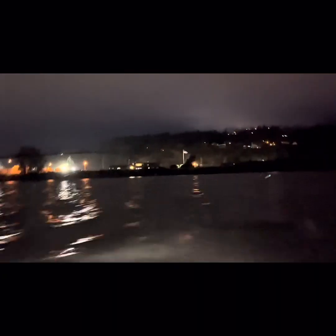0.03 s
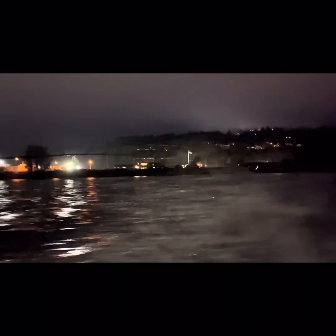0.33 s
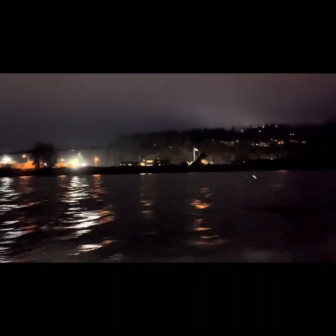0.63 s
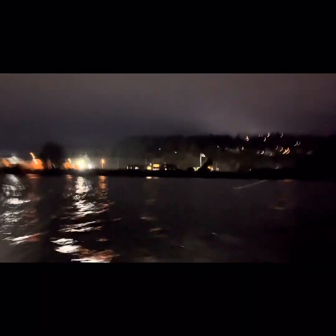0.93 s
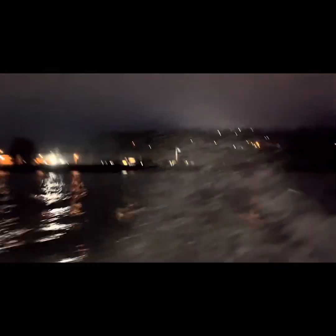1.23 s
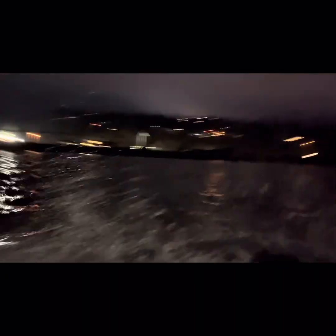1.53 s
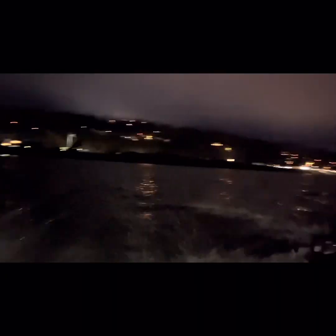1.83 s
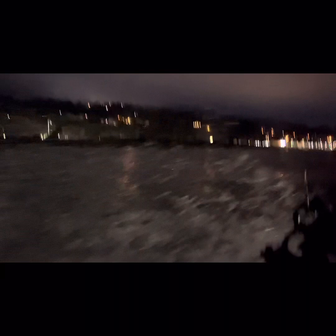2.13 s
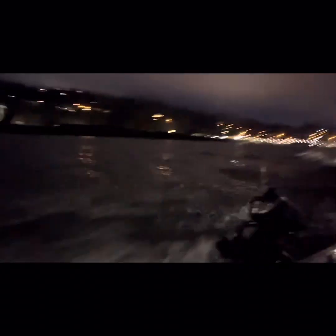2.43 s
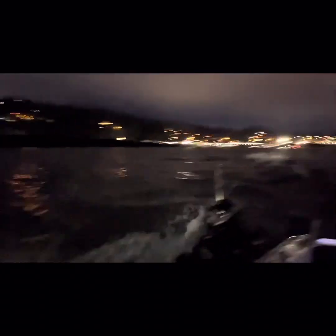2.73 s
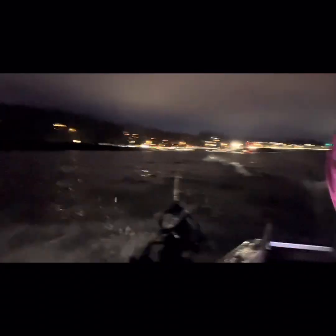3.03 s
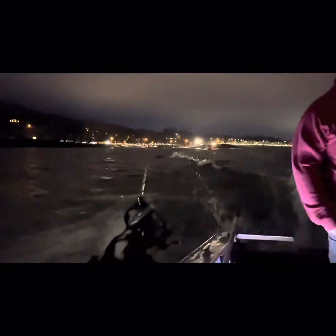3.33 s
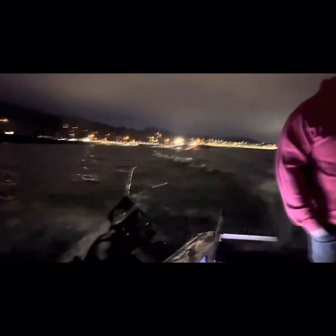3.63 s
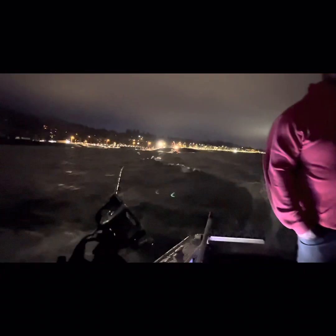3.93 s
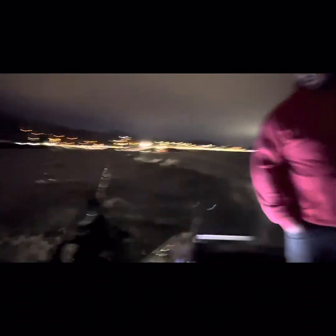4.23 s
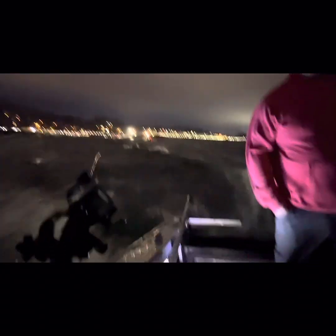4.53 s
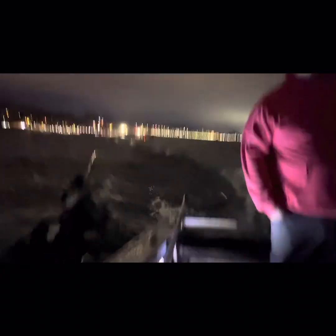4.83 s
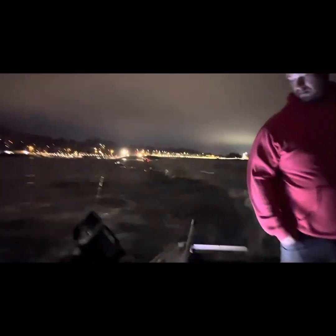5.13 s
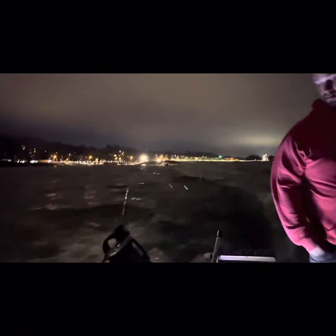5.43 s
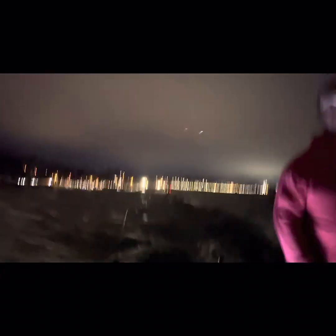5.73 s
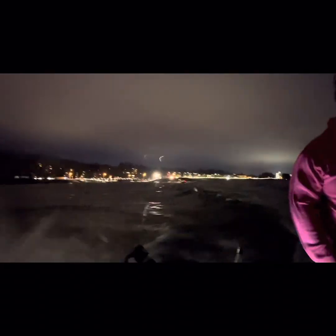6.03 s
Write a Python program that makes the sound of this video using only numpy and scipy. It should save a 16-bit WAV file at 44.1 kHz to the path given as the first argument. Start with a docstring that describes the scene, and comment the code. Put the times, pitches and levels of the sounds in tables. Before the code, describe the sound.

An open motorboat speeds over a choppy river, heard close up on board. From the start the outboard drones, water hisses along the hull and wind buffets the microphone. Just before one second, waves smack and burst into spray, and the hull gives a short, low boom. The wash then keeps surging with more gusts and splashes while the engine creeps slightly up in pitch.

```python
"""An open motorboat runs fast over choppy river water, heard on board through two close microphone ports.
From the start the outboard's firing drones, water hisses along the hull, and headwind buffets the ports.
Just before one second, waves smack and burst into spray, and the heaviest makes the hull boom.
After that the wash keeps surging, with more gusts and splashes, while the engine speed creeps up."""
import sys
import numpy as np
from scipy import signal
from scipy.fft import rfft, irfft
from scipy.io import wavfile
from scipy.ndimage import uniform_filter1d

SR = 44100
rng = np.random.default_rng(int(sys.argv[2]) if len(sys.argv) > 2 else 0)


def log_audio(samples):
    """Write samples as a 16-bit WAV file to the path given in sys.argv[1]."""
    # one column per channel
    frames = np.atleast_2d(samples).T
    # limit to full scale, then quantise
    limited = np.clip(frames, -1, 1)
    pcm = np.round(limited * 32767).astype(np.int16)
    wavfile.write(sys.argv[1], SR, pcm)


N = 268569
T, HZ = np.arange(N) / SR, np.fft.rfftfreq(N, 1 / SR)

# how alike the wind sounds on the left and right: pitch_hz, likeness (1 same, 0 unrelated, -1 opposite)
WIND_LIKENESS = [(50, .95), (100, .9), (200, .69), (400, .62), (700, .45), (1000, .15), (1500, -.25),
                 (2000, .3), (8000, .2)]
# how alike the water sounds on the left and right: pitch_hz, likeness
WATER_LIKENESS = [(100, .85), (500, .62), (900, .15), (1250, -.05), (1600, -.6), (1750, .68), (2500, .5),
                  (5000, .42), (6500, .55), (7500, .82), (8300, .97), (10000, .85), (12000, .96),
                  (14000, .85)]


def amp(db):
    """Turns decibels into a gain."""
    return 10 ** (np.asarray(db) / 20)


def unit(x):
    """Scales a signal to an average (rms) level of 1."""
    return x / np.sqrt(np.mean(x ** 2) + 1e-20)


def over_time(rows):
    """Joins the rows of a timed table into one curve per column."""
    times, *columns = np.transpose(rows)
    return [np.interp(T, times, column) for column in columns]


def over_pitch(rows):
    """Joins the rows of a table into a curve from low to high pitch."""
    hz, value = np.transpose(rows)
    return np.interp(np.log(HZ + 1), np.log(hz + 1), value)


def wander(hz):
    """A smooth random wobble that moves up to about hz times a second."""
    return unit(irfft(rfft(rng.standard_normal(N)) * np.exp(-(HZ / hz) ** 2), N))


def white():
    """Two unrelated noises."""
    return rng.standard_normal((2, N))


def treble(x, corner_hz):
    """The part of a sound above corner_hz."""
    return irfft(rfft(x) * (1 - 1 / (1 + (HZ / corner_hz) ** 6)), N)


def steady(x, span_s):
    """Evens out the slow level changes of a noise and keeps its fast grain."""
    window = np.hanning(max(int(span_s * SR), 9))
    power = signal.fftconvolve((x ** 2).mean(0), window / window.sum(), "same")
    return x / np.sqrt(power + 1e-9)


def patchy(x, depth_db, span_hz, span_s, size):
    """Lets the level drift separately in small patches of pitch and time."""
    frames = dict(nperseg=size, noverlap=size * 3 // 4)
    spectrum = signal.stft(x, **frames)[2]
    drift = rng.standard_normal(spectrum.shape[1:])
    for axis, span in enumerate((span_hz * size / SR, span_s * 4 * SR / size)):
        drift = uniform_filter1d(drift, max(round(span), 1), axis)
    return signal.istft(spectrum * amp(depth_db * unit(drift)), **frames)[1][:, :N]


def strike(start_s, rise_s, decay_s):
    """The level of one hit: it climbs straight to 1, then dies away."""
    age = T - start_s
    return np.clip(age / rise_s, 0, 1) * np.exp(-np.maximum(age - rise_s, 0) / decay_s)


def ports(pair, gain, likeness):
    """Shapes the tone of two unrelated signals and blends them into a partly alike left and right."""
    # how much louder the left port hears: pitch_hz, level_db
    balance = [(50, 0), (500, .6), (720, 1.6), (980, .8), (1200, -2.2), (1500, -3.7), (1630, -3.4),
               (1720, 2), (2300, 1.6), (3000, .8), (4000, .8), (4800, 2), (6000, 1), (8000, 0)]
    # how far the left port is ahead: pitch_hz, phase_radians
    left_lead = [(50, -.1), (300, -.25), (700, -.45), (1300, 0), (2000, .3), (3100, .9), (4800, .2),
                 (6500, -1.35), (8300, -3.14), (10000, -4.8), (12000, -6.3), (15300, -9.2)]
    same = np.clip(over_pitch(likeness), -1, 1)
    lean = amp(over_pitch(balance) / 2)
    common, apart = rfft(pair) * gain * np.sqrt([1 + same, 1 - same])
    left = (common + apart) * lean
    right = (common - apart) / lean * np.exp(-1j * over_pitch(left_lead))
    return unit(irfft(np.array([left, right]), N))


def thumps(rise_s=.0082, decay_s=.014):
    """The level of large, slow eddies (swirls of air) that thump the microphone."""
    # large eddies: peak_s, level_db
    eddies = [(.091, -22), (.445, -21), (1.644, -12), (1.745, -13), (1.86, -13), (1.907, -13), (2.428, -14),
              (3.029, -15), (3.129, -15), (3.175, -10), (3.31, -9.5), (3.42, -9), (3.707, -12),
              (3.899, -10.5), (4.188, -15.5), (4.359, -15), (4.45, -13.5), (4.545, -19), (5.059, -14),
              (5.216, -15), (5.424, -16), (5.504, -13.5), (5.57, -10.5), (5.641, -11.5), (5.77, -14),
              (5.812, -12.5)]
    level = 0
    for peak_s, db in eddies:
        distance = np.maximum((peak_s - T) / rise_s, (T - peak_s) / decay_s)
        level += amp(db) * np.exp(-np.minimum(distance ** 2 / 2, 20))
    return level


def headwind(rise_s=.02, fall_s=.022, throb_hz=8.8, throb_db=1.3, throb_delay_s=.034):
    """Gusts swell, throb as they shed eddies, and fade: a low rumble under a lumpy flutter."""
    # gusts of wind: start_s, length_s, rumble_db, flutter_db
    gusts = [(0, 0.11, -19.5, -22), (0.172, 0.051, -24, -25.5), (0.418, .025, -19, -24.5),
             (0.549, 0.086, -17, -20), (0.817, 0.05, -25, -20.5), (1.038, 0.029, -19, -25.5),
             (1.08, 0.044, -18.5, -20.5), (1.573, 0.12, -17, -17.5), (1.712, 0.047, -16, -20.5),
             (1.788, 0.22, -19, -18.5), (2.292, 0.12, -23.5, -25.5), (2.52, 0.029, -22, -24.5),
             (2.641, 0.075, -16.5, -21), (2.777, 0.03, -24, -41), (2.896, 0.088, -21.5, -25),
             (3, 0.25, -21, -24.5), (3.288, .09, -18, -22.5), (3.378, 0.067, -15.5, -18),
             (3.468, 0.037, -23, -25.5), (3.66, 0.079, -16.5, -19), (3.76, 0.15, -22, -20.5),
             (4.142, 0.036, -22, -21), (4.262, 0.11, -21, -20.5), (4.428, 0.173, -27.5, -27),
             (4.734, .05, -29, -37), (4.86, 0.098, -19.5, -26.5), (5.028, 0.039, -22, -21),
             (5.088, 0.064, -16, -20), (5.216, 0.052, -17, -23), (5.321, 0.017, -17, -24),
             (5.366, 0.082, -16.5, -19), (5.5, 0.13, -21, -23.5), (5.684, 0.18, -20, -21),
             (5.918, 0.044, -22, -32), (6.015, .043, -16.5, -23)]
    # tone of the rumble: pitch_hz, level_db
    rumble_tone = [(22, -55), (43, -6.5), (65, 0.5), (90, -1), (130, -7.5), (200, -15.5), (400, -53),
                   (1500, -97)]
    # tone of the flutter: pitch_hz, level_db
    flutter_tone = [(30, -33), (90, -21), (150, -1), (300, -4), (500, -6), (680, -10), (850, -13),
                    (1200, -19), (1600, -31.5), (1800, -28.5), (4500, -83), (14000, -134)]
    rumble_power, flutter_power = amp(-26) ** 2, amp(-30.5) ** 2  # the wind between gusts
    for start_s, length_s, rumble_db, flutter_db in gusts:
        age = T - start_s
        gust = np.clip(age / rise_s + .5, 0, 1) * np.exp(-np.maximum(age - length_s, 0) / fall_s)
        gust *= amp(throb_db * np.cos(2 * np.pi * throb_hz * (age - throb_delay_s)))
        rumble_power += (amp(rumble_db) * gust) ** 2
        flutter_power += (amp(flutter_db) * gust) ** 2
    rumble_power += thumps() ** 2
    rumble = steady(ports(white(), amp(over_pitch(rumble_tone)), WIND_LIKENESS), span_s=.055)
    lumps = patchy(white(), depth_db=3, span_hz=298, span_s=.017, size=512) * amp(1.36 * wander(98))
    flutter = steady(ports(lumps, amp(over_pitch(flutter_tone)), WIND_LIKENESS), span_s=.04)
    waver = amp(.86 * wander(22))
    return waver * (np.sqrt(rumble_power) * rumble + np.sqrt(flutter_power) * flutter)


def buffets(rise_s=.0014, decay_s=.0064, middle_hz=272.7):
    """Each hard eddy hits the microphone with a short, ragged puff; larger eddies sound lower."""
    # the hardest eddies: peak_s, level_db, pitch_hz
    eddies = [(0.031, -14, 260), (.132, -15, 351), (.148, -16.5, 250), (.25, -18, 400), (.29, -15, 372),
              (.575, -15.5, 280), (.595, -14.5, 210), (.633, -10.5, 279), (1.06, -19.5, 230),
              (1.123, -13, 220), (1.585, -15, 253), (1.606, -11, 275), (1.629, -11, 190),
              (1.724, -8.5, 362), (1.735, -8, 280), (1.761, -13.5, 315), (1.801, -11, 416),
              (1.826, -11.5, 360), (1.854, -16, 180), (1.894, -14, 268), (1.935, -15, 295),
              (1.996, -12.5, 325), (2.058, -15.5, 250), (2.292, -16, 268), (2.359, -16.5, 282),
              (2.392, -17, 285), (2.456, -14.5, 200), (2.645, -10.5, 360), (2.659, -17, 250),
              (2.699, -14.5, 345), (3.109, -16, 220), (3.17, -7, 289), (3.291, -10, 370), (3.306, -17, 211),
              (3.358, -13, 330), (3.397, -11.5, 239), (3.449, -13, 310), (3.552, -17, 295),
              (3.641, -13.5, 280), (3.696, -10.5, 320), (3.713, -10.5, 244), (3.861, -10.5, 427),
              (4.123, -16, 335), (4.161, -15, 360), (4.278, -17.5, 285), (4.336, -6.5, 330),
              (4.369, -9.5, 270), (4.542, -16.5, 240), (4.715, -18, 302), (4.744, -16, 240),
              (4.861, -14.5, 345), (4.918, -10, 234), (5.074, -14, 348), (5.096, -17, 338),
              (5.114, -11, 307), (5.139, -11.5, 268), (5.232, -13.5, 251), (5.333, -14.5, 244),
              (5.389, -13, 250), (5.494, -13.5, 330), (5.558, -10.5, 240), (5.696, -12.5, 250),
              (5.752, -8.5, 247), (5.846, -15, 272), (6.04, -13.5, 290)]
    # tone of a middle-sized eddy: pitch_hz, level_db
    tone = [(20, -34), (65, -22), (130, -5.5), (300, 0), (500, -8.5), (700, -10.5), (900, -24.5),
            (1250, -24.5), (1800, -38), (4500, -84), (14000, -97)]
    air = steady(ports(white(), amp(over_pitch(tone)), WIND_LIKENESS), span_s=.009)
    out = np.zeros((2, N))
    for peak_s, db, hz in eddies:
        near = slice(*np.searchsorted(T, (peak_s - 4 * rise_s, peak_s + 4 * decay_s)))
        age = T[near] - peak_s
        retuned = np.array([np.interp(peak_s + age * hz / middle_hz, T, side) for side in air])
        puff = np.exp(-np.maximum(-age / rise_s, age / decay_s) ** 2 / 2)
        out[:, near] += amp(db) * puff * retuned
    return out


def facing_wind(air):
    """Wind that meets the ports head-on sheds smaller eddies and sounds brighter."""
    # how squarely the wind hits: time_s, treble_db
    exposure = [(0, -7.5), (1.1, -3), (1.7, -7), (2.3, 5), (2.7, -0.5), (3.4, 7.5), (3.7, 1), (4.35, -3.5),
                (5.1, 4), (5.4, 4), (5.8, 3), (6.09, -2)]
    (treble_db,) = over_time(exposure)
    return air + (amp(treble_db) - 1) * treble(air, corner_hz=900)


def drops(per_s, spread_db):
    """Scattered ticks of landing drops, mostly small and a few large."""
    size = amp(spread_db * np.minimum(rng.exponential(1, (2, N)), 4))
    return unit(white() * size * (rng.random((2, N)) < per_s / SR))


def surges(width_scale):
    """The water's level as the hull ploughs through two or three waves a second."""
    # waves: crest_s, level_db, half_width_s (before width_scale)
    waves = [(.01, -36, 0.056), (.22, -41.5, .04), (.43, -35, 0.12), (.86, -32, 0.09), (1.22, -37.5, 0.12),
             (1.63, -33.5, 0.13), (2.08, -36, 0.14), (2.57, -34.5, 0.12), (3.08, -43, 0.052),
             (3.33, -35, 0.14), (3.86, -40.5, 0.077), (4.2, -38, 0.085), (4.63, -42, 0.045),
             (5.06, -39, 0.085), (5.43, -40.5, 0.084), (5.819, -37.5, 0.13)]
    power = sum(amp(db) ** 2 * np.exp(-((T - crest_s) / (width * width_scale)) ** 2 / 2)
                for crest_s, db, width in waves)
    return np.sqrt(power)


def wash(calm_rush_db=-30.5, calm_spray_db=-40, rush_boost_db=8):
    """Churning water and fine spray swell with each wave, dotted with drops and gurgling with bubbles."""
    # tone of the rushing water: pitch_hz, level_db
    rush_tone = [(25, -24), (100, 16), (300, 15), (550, 11), (900, 5), (1300, 6), (1600, 4.5), (1750, 2),
                 (2600, 2), (4600, 0.5), (5600, -4.5), (7500, -3.5), (10000, -112), (16000, -40)]
    # tone of the spray: pitch_hz, level_db
    spray_tone = [(2500, -30), (4700, -7), (6500, -1.5), (8300, -1.3), (9500, 1.2), (11500, .3),
                  (13000, -2.5), (14500, -7.5)]
    churn = white() * amp(.12 * wander(52)) + .5 * drops(per_s=1700, spread_db=2)
    mist = white() * amp(.79 * wander(45)) + .084 * drops(per_s=2700, spread_db=14)
    churn, mist = (patchy(x, depth_db=2.5, span_hz=170, span_s=.04, size=1024) for x in (churn, mist))
    rush = ports(churn, amp(over_pitch(rush_tone)), WATER_LIKENESS)
    spray = ports(mist, amp(over_pitch(spray_tone)), WATER_LIKENESS)
    # the steady spray fades a little as the microphone turns from the side to the stern
    turn_db = np.interp(T, (1.9, 3.4), (0, -1.4))
    rush_level = np.hypot(amp(calm_rush_db), amp(rush_boost_db) * surges(width_scale=.78))
    spray_level = np.hypot(amp(calm_spray_db + turn_db), surges(width_scale=.79))
    return rush_level * rush + spray_level * spray


def showers():
    """Fine drops fall back together and fizz."""
    # sheets of falling spray: start_s, level_db
    sheets = [(.19, -33), (.725, -30), (.872, -24), (.93, -35), (1.615, -36), (2.6, -32), (4.59, -33),
              (5.825, -37)]
    # tone of the fizz: pitch_hz, level_db
    tone = [(2000, -25), (5000, -8), (8000, -2), (11000, 0), (14500, -4)]
    level = sum(amp(db) * strike(start_s, rise_s=.005, decay_s=.014) for start_s, db in sheets)
    fizz = white() + drops(per_s=2500, spread_db=3)
    return level * ports(fizz, amp(over_pitch(tone)), WATER_LIKENESS)


def smacks():
    """A small crest meets the hull flat: a bright crack that is gone at once."""
    # small crests: start_s, level_db
    crests = [(.826, -21), (.84, -20), (.869, -23), (.88, -23), (2.445, -22.5), (3.346, -22.5),
              (3.751, -27.5), (4.124, -23), (5.243, -23), (5.775, -17.5), (5.847, -26.5)]
    # tone of the crack: pitch_hz, level_db
    tone = [(300, -12), (1200, -6), (2000, -2), (3000, 0), (4600, -2), (6000, -10), (9000, -20),
            (15000, -30)]
    level = sum(amp(db) * strike(start_s, rise_s=.0007, decay_s=.0065) for start_s, db in crests)
    return level * ports(white(), amp(over_pitch(tone)), WATER_LIKENESS)


def splashes():
    """A wave bursts on the hull into a crackle that quickly fades; finer drops sound brighter."""
    # bursting waves: start_s, level_db, rise_s, decay_s, treble_db
    bursts = [(.008, -26, .0091, .02, 3.5), (.825, -23, .0036, 0.012, -2), (0.84, -18.5, 0.0052, 0.023, 0),
              (.855, -21, .004, 0.061, -1), (1.612, -26, 0.011, 0.054, 6), (2.59, -40, .011, .03, 0),
              (3.286, -22.5, 0.0015, 0.012, -3), (3.347, -23, .0027, 0.059, 2.5),
              (5.772, -27, .005, .072, -1), (5.83, -31, 0.012, 0.084, 0)]
    # tone of a splash: pitch_hz, level_db
    tone = [(60, -14), (200, 2), (420, 8.5), (1400, 7.3), (2100, 6.3), (3000, .8), (4600, -.3),
            (6000, -5.5), (10000, -13), (15000, -20)]
    crackle = white() + drops(per_s=1100, spread_db=3)
    crackle = patchy(crackle, depth_db=3, span_hz=900, span_s=.006, size=256)
    crackle = steady(ports(crackle, amp(over_pitch(tone)), WATER_LIKENESS), span_s=.012)
    fine = treble(crackle, corner_hz=2900)
    return sum(amp(db) * strike(start_s, rise_s, decay_s) * (crackle + (amp(treble_db) - 1) * fine)
               for start_s, db, rise_s, decay_s, treble_db in bursts)


def hull_boom(start_s=.9, level_db=-5, pitch_hz=72.6, rise_s=.0033, decay_s=.023):
    """The hull drops onto the heaviest wave and booms for a few cycles."""
    age = np.maximum(T - start_s, 0)
    level = amp(level_db) * np.minimum(age / rise_s, 1) * np.exp(-age / decay_s)
    return level * np.sin(2 * np.pi * pitch_hz * age)


def resonances(modes):
    """The gain of a part that rings around a few pitches."""
    return sum(amp(db) / (1 + (2 * (HZ - hz) / width_hz) ** 2) for hz, width_hz, db in modes)


def follow_speed(x, firing_hz):
    """Lets the pitch of a sound ride up and down with the engine speed."""
    place = np.cumsum(firing_hz / firing_hz.mean())
    return np.array([np.interp(place, np.arange(N), side) for side in x])


def outboard():
    """Each firing pushes a pulse out of the exhaust and shakes the housing, casing and gears."""
    # engine speed: time_s, firing_hz
    speed = [(0, 141.3), (.18, 142), (.4, 145), (.58, 146.5), (.78, 145.8), (1.0, 147.6), (1.18, 147.8),
             (1.33, 146.8), (1.52, 148.5), (1.9, 147.8), (2.2, 149.3), (2.8, 151), (3.1, 150.8),
             (3.55, 151.8), (4.4, 151.3), (4.6, 152), (5.0, 151.9), (6.09, 153.5)]
    # loudness of the engine's parts: time_s, drone_db, rasp_db, whine_db
    levels = [(0, -42, -47, -62), (.6, -34.5, -40, -62), (.95, -25.5, -43, -40), (1.3, -25.5, -43, -49),
              (1.55, -25, -55, -57), (1.7, -30, -42, -45), (2.0, -31, -39, -40), (2.5, -33, -36, -51),
              (3.0, -42, -39, -40.5), (3.6, -38, -55, -40), (4.1, -35.5, -41.5, -40.5),
              (4.6, -35.5, -50, -35.5), (5.2, -31, -43, -41), (6.09, -34, -40, -41)]
    # exhaust tones: multiple_of_firing_rate, relative_db
    exhaust = [(.5, -11.5), (1, -5), (1.5, -17), (2.5, -12.5), (3, -10), (3.5, -23), (4, -0.5), (5, -6)]
    # growling ring of the exhaust housing: pitch_hz, width_hz, level_db
    housing = [(278, 84, -5.5), (496, 94, -4.5), (635, 100, -8), (790, 160, -10.5)]
    # rasping ring of the engine casing: pitch_hz, width_hz, level_db
    casing = [(1270, 150, -5), (1430, 120, 0), (1560, 60, -9)]
    # whining ring of the gears: pitch_hz, width_hz, level_db
    gears = [(1190, 110, -1.5), (1480, 110, -7.5), (2003, 115, -4.7), (2510, 130, -15)]
    # how alike this ringing sounds on the left and right: pitch_hz, likeness
    likeness = [(500, .62), (1200, .3), (1450, .45), (2000, .55), (5000, .42)]
    (firing_hz,) = over_time(speed)
    drone_db, rasp_db, whine_db = over_time(levels)
    unsteady = 1 + .0065 * wander(12) + .0125 * wander(70)  # the load wavers; no two firings are alike
    phase = 2 * np.pi * np.cumsum(firing_hz * unsteady) / SR
    tones = np.zeros((2, N))
    for multiple, db in exhaust:  # half multiples appear because the crank turns once in two firings
        lag = np.array([[0], [.14]]) * multiple  # the right port hears it slightly later
        level = amp(db + 1.6 * wander(21))
        tones += level * np.cos(multiple * phase + 2 * np.pi * rng.random() - lag)
    pulses = 1 + 1.2 * np.cos(phase)
    growl, rasp, whine = (ports(white() * pulses, resonances(part), likeness)
                          for part in (housing, casing, gears))
    drone = unit(tones) + amp(-5.5) * growl
    return amp(drone_db) * drone + amp(rasp_db) * rasp + amp(whine_db) * follow_speed(whine, firing_hz)


def scene():
    """Water, engine and wind in the open air."""
    water = wash() + splashes() + smacks() + hull_boom() + showers()
    return water + outboard() + facing_wind(headwind() + buffets())


def record(dry, ceiling=.95, cutoff_hz=14500):
    """Rounds off the loudest peaks, then cuts the highest treble."""
    rounded = dry / (1 + (dry / ceiling) ** 8) ** (1 / 8)
    low_pass = signal.firwin(511, cutoff_hz, window=("kaiser", 9), fs=SR)
    return signal.oaconvolve(rounded, low_pass[None], "same")


dry = scene()
out = record(dry)
log_audio(out)
```